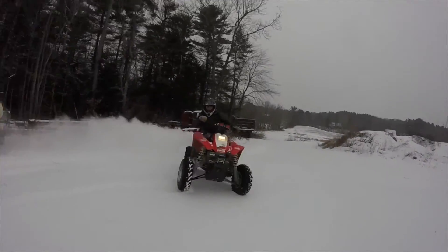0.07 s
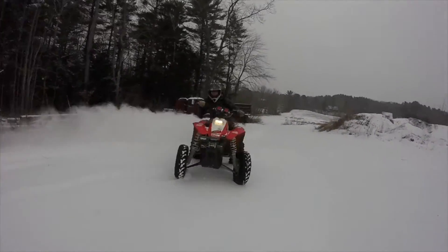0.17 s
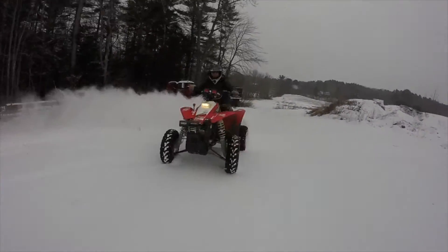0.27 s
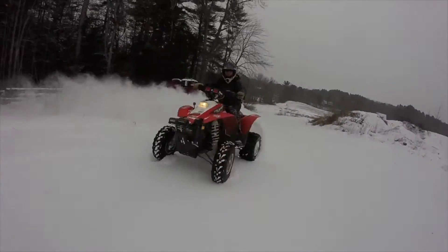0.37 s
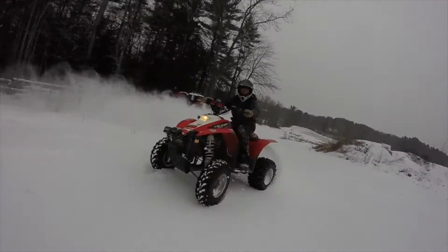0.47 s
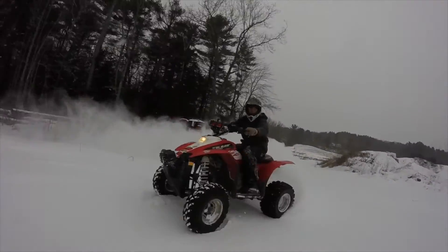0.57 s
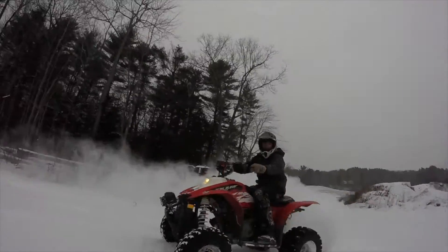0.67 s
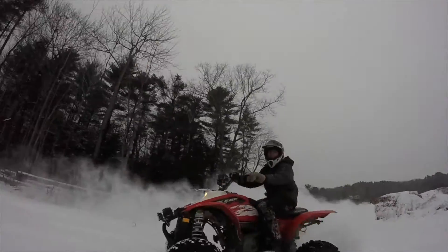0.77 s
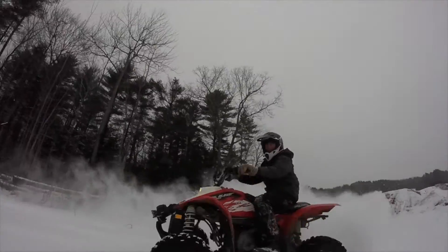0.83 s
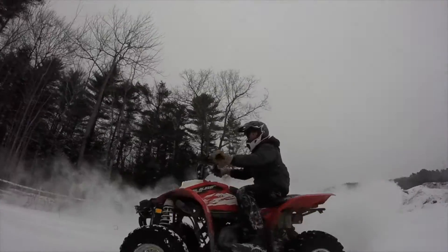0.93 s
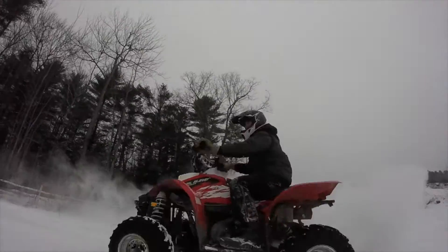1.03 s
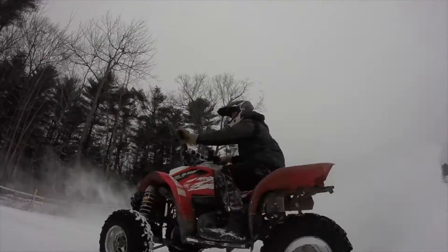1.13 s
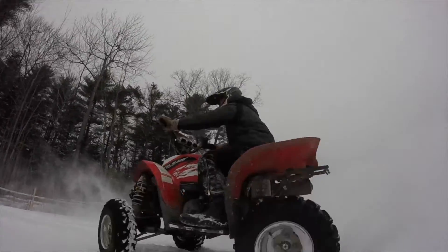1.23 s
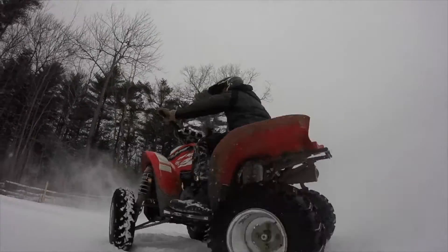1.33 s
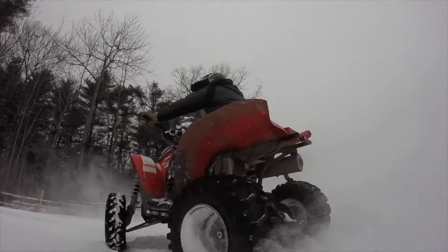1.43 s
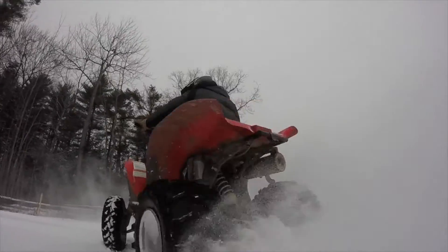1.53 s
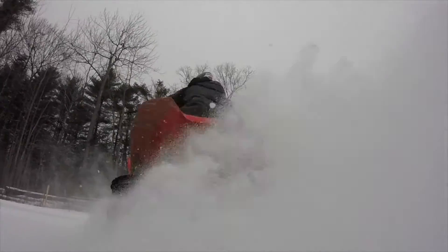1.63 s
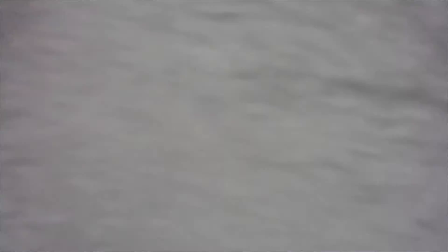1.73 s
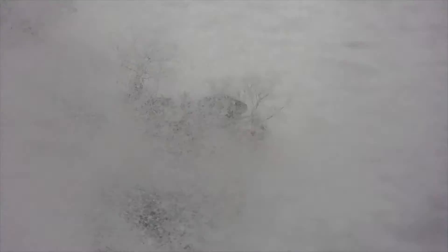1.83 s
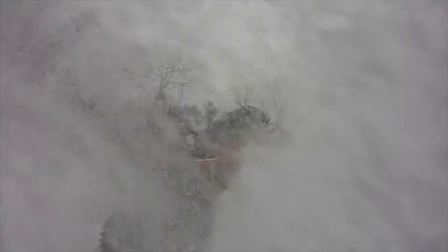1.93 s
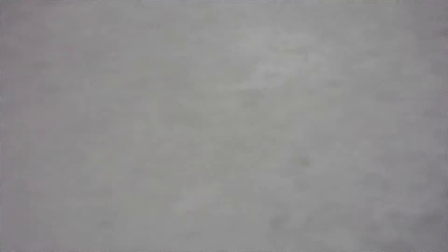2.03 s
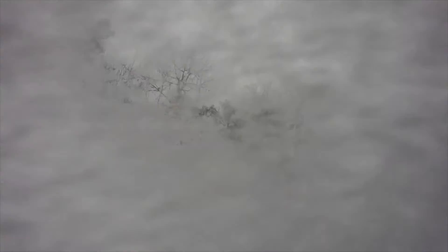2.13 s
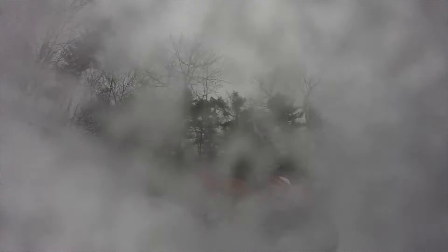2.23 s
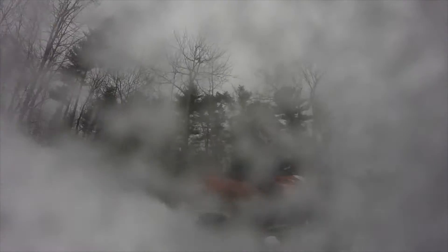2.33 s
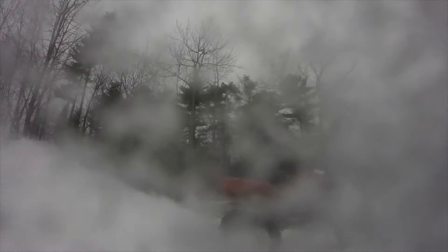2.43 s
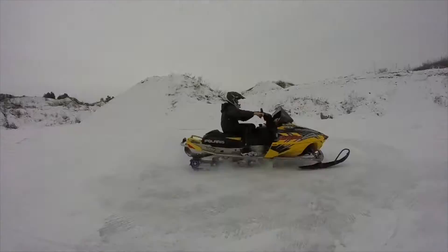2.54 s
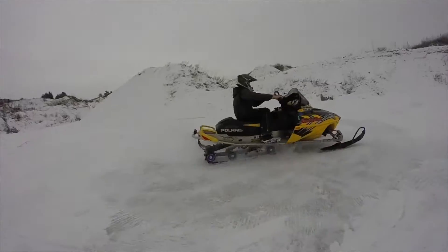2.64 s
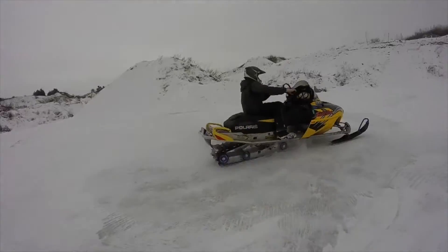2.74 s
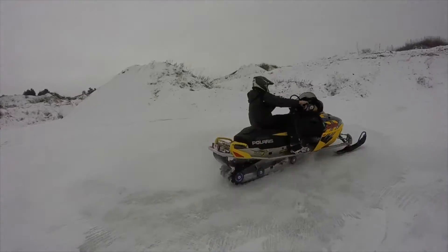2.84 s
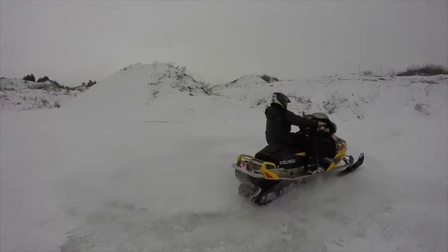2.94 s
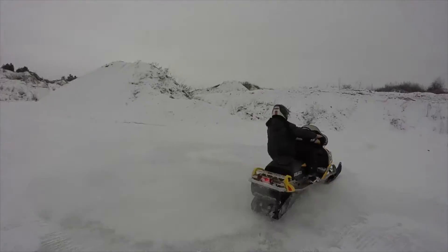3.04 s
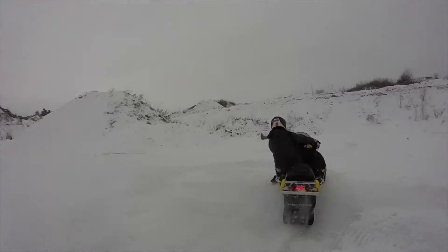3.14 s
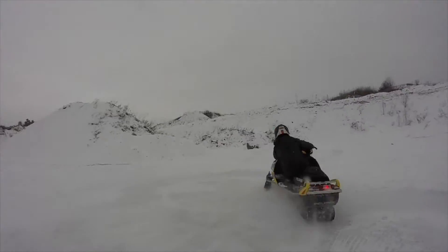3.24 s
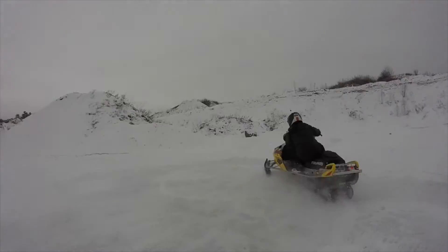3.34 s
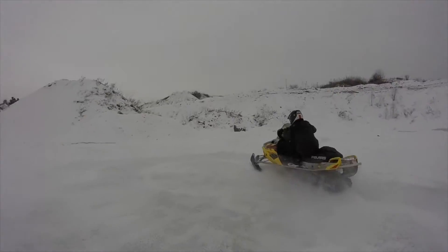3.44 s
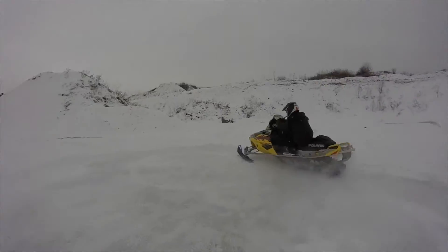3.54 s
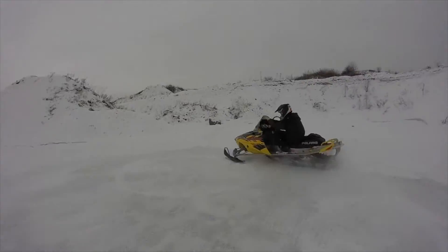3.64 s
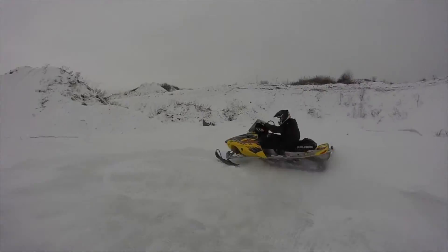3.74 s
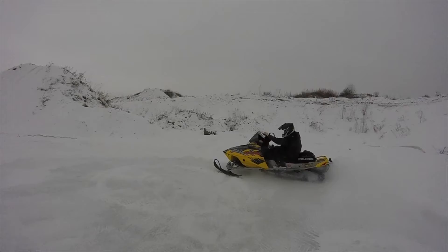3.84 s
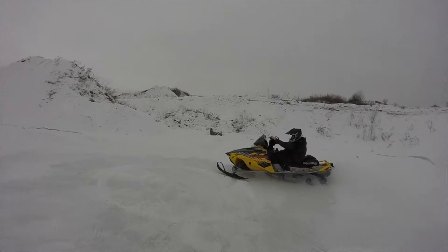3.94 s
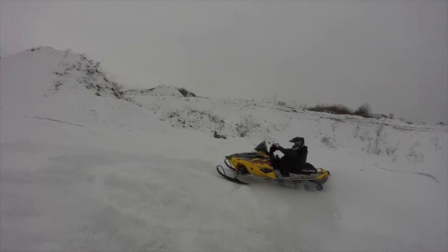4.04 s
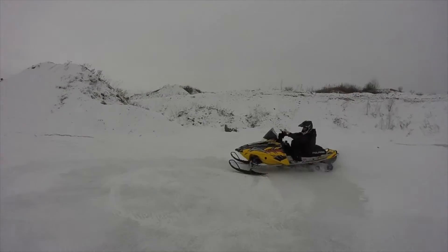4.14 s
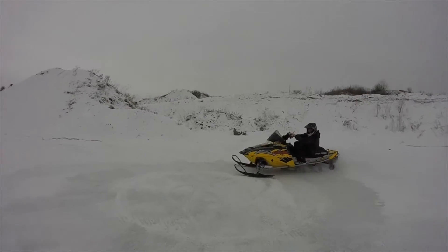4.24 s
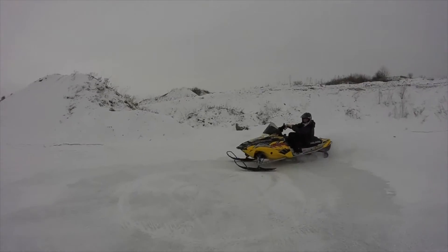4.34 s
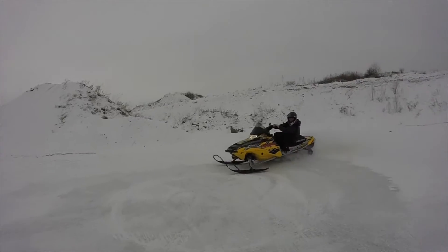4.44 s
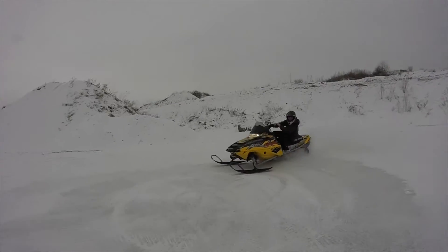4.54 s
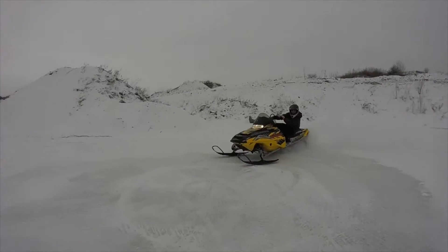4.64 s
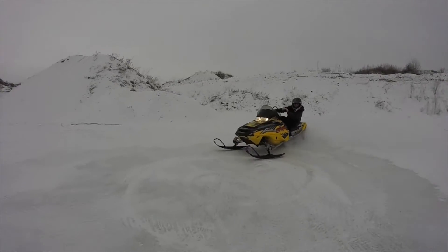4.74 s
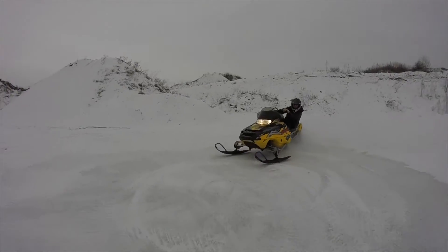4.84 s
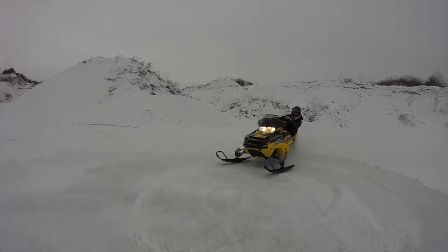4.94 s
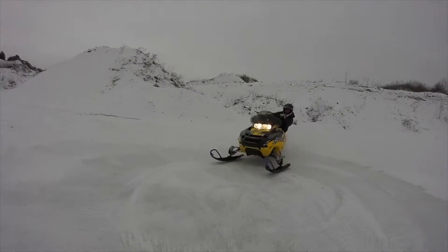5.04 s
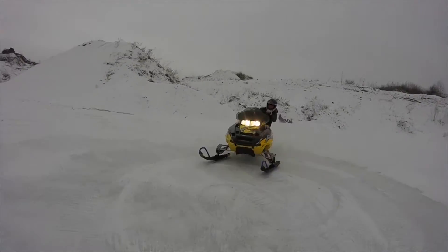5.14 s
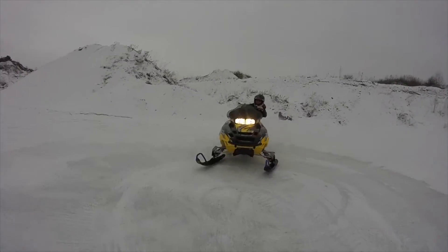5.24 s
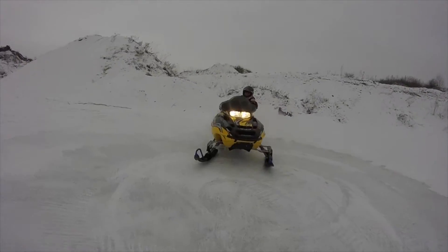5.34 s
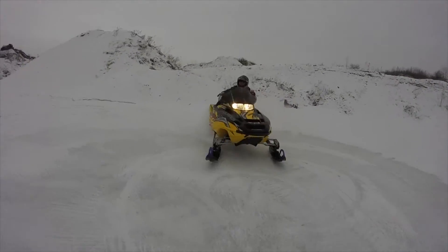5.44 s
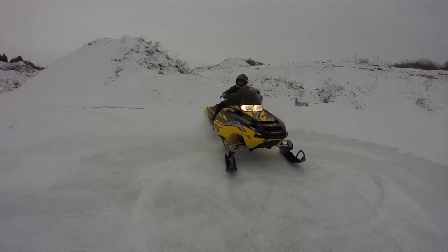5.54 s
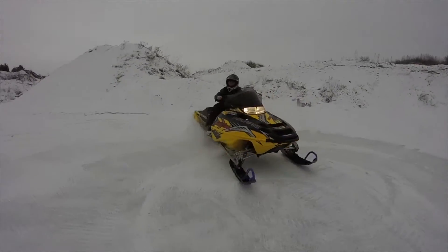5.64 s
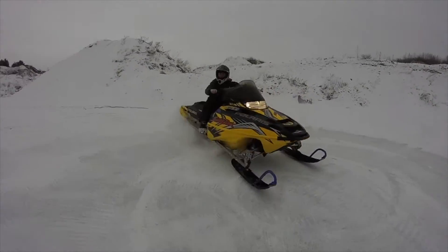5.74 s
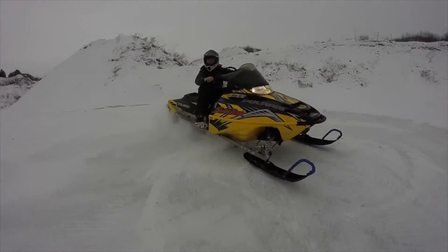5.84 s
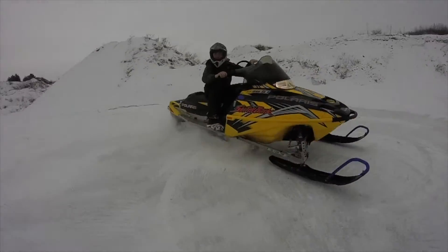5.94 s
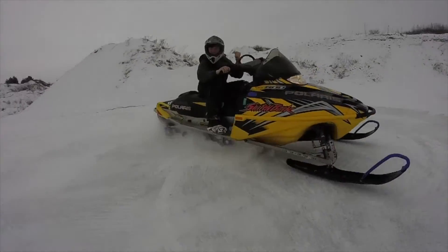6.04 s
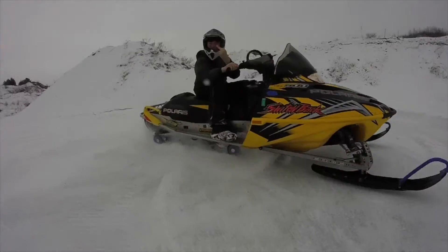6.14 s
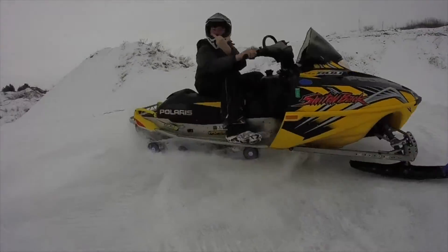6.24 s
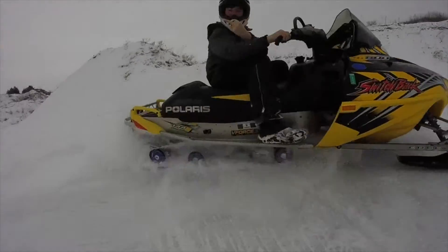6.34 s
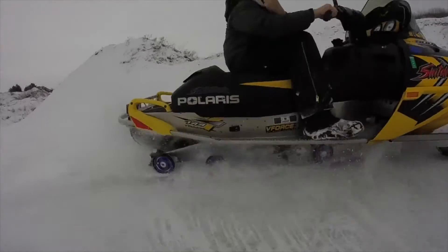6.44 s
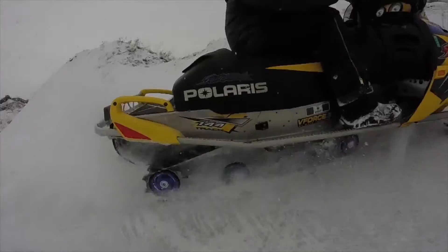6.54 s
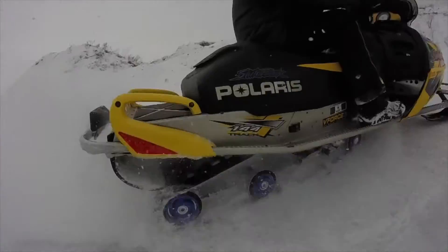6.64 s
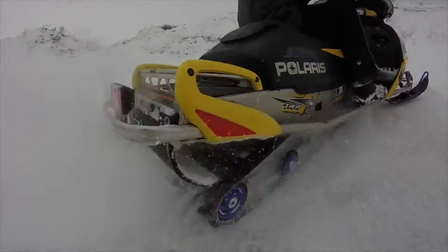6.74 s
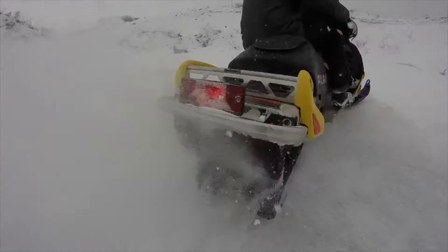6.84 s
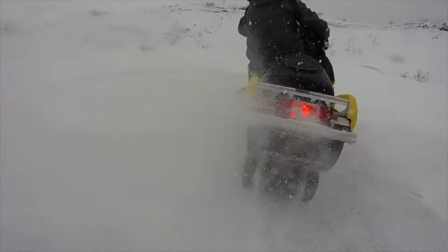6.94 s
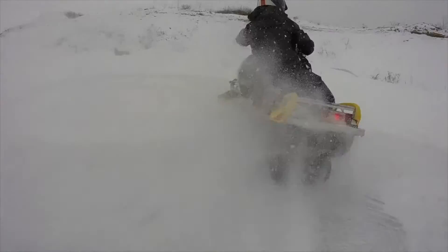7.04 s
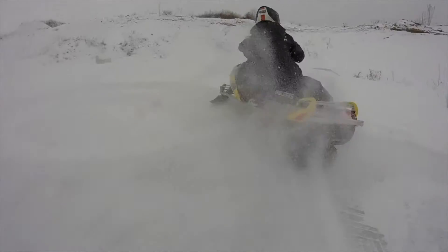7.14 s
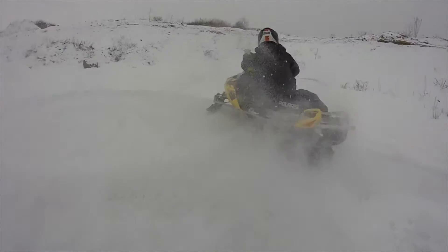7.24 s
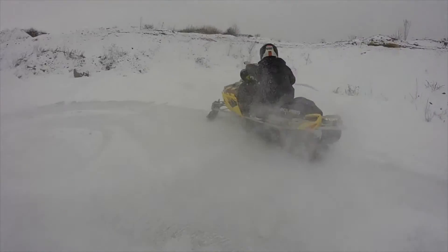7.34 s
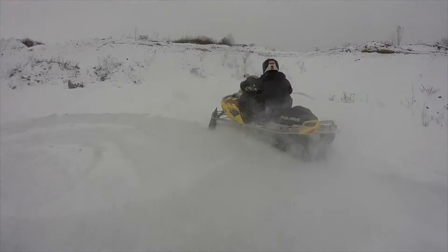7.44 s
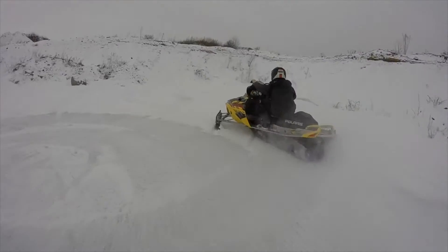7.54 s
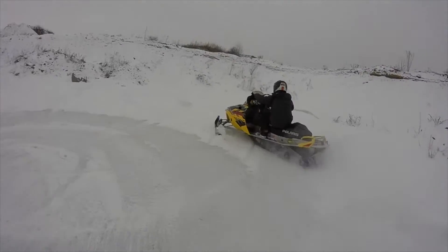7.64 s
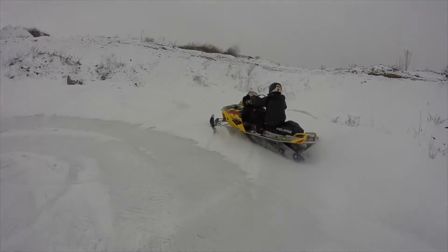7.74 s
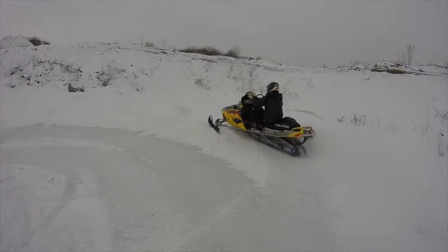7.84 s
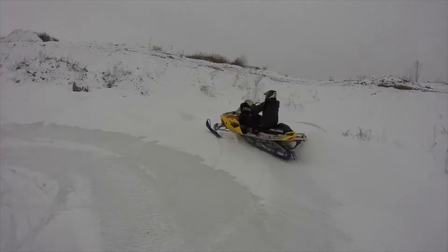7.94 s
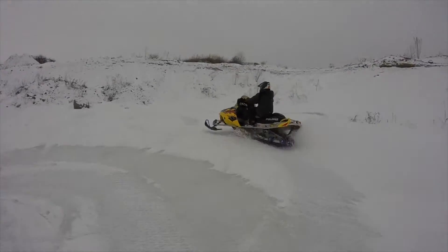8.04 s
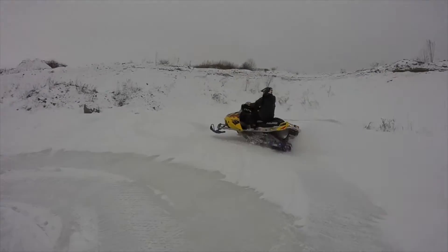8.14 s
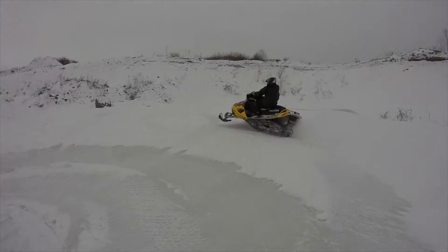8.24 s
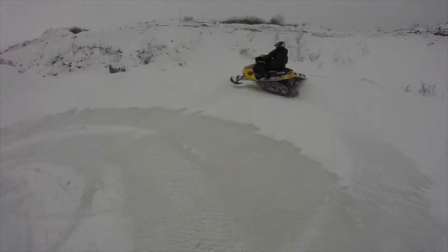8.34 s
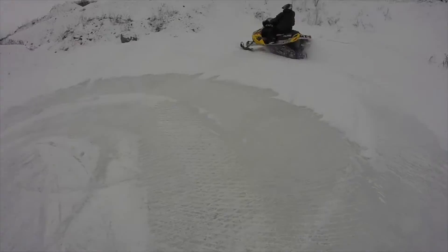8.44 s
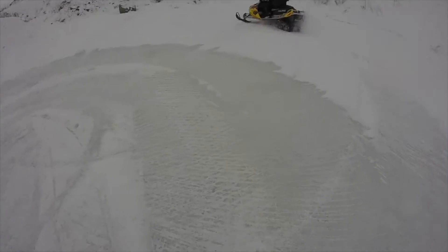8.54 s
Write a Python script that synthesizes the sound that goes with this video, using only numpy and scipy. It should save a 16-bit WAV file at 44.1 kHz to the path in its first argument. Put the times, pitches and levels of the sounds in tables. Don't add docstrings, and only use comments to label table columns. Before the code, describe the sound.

Open snowy ground, heard through a small plastic camera case that gives everything a hard, nasal midrange ring. From 0 s a single-cylinder quad putters low and rapid, with faint whistling gears and rattling panels; a lump knocks the case at 0.5 s. It grows nearer and rougher, strongest around 1.6-1.85 s. At 1.8-2.2 s snow slams the case: clustered knocks, a heavy thump, crackling hiss and bright ticks, while the engine drops and fades. At about 2.6 s a sudden cut brings a raspy two-stroke snowmobile, revs surging and sagging every fraction of a second. It is farther off around 4-5 s, barks at 5.7 s, then swells with a metallic whine from 6 to 6.9 s. Around 7-7.2 s it is loudest, coughing sharp pops amid ticking grains. It recedes after 7.3 s, dull and faint by 8.3 s, with a last small knock near 8.56 s. Wind rumbles softly throughout.

```python
import sys
import numpy as np
from scipy import signal
from scipy.fft import rfft, irfft
from scipy.io import wavfile
from scipy.ndimage import uniform_filter1d

SR = 44100
rng = np.random.default_rng(int(sys.argv[2]) if len(sys.argv) > 2 else 0)


def magnitude_from_level(level_db):
    exponent = np.asarray(level_db, float) / 20
    return 10 ** exponent


def put_to_file(sound):
    columns = np.atleast_2d(sound).T
    safe = np.clip(columns, -1, 1)
    whole_steps = np.round(safe * 32767)
    wavfile.write(sys.argv[1], SR, whole_steps.astype(np.int16))


N = 379260


def noise():
    return rng.standard_normal(N)


def unit(x):
    return x / np.sqrt(np.mean(x ** 2))


def curves(table):
    s, *columns = np.transpose(table)
    return [np.interp(np.arange(N) / SR, s, c) for c in columns]


def walk(rate):
    k = int(SR / rate)
    held = np.repeat(rng.standard_normal(N // k + 1), k)
    return unit(uniform_filter1d(uniform_filter1d(held, k), k)[:N])


def band(x, lo_hz, hi_hz, order=3):
    return signal.sosfilt(signal.butter(order, [lo_hz, hi_hz], "bandpass", fs=SR, output="sos"), x)


def swell(s, db, hold_s, rise, fall):
    t = np.arange(N) / SR - s
    return db + np.minimum(rise * np.minimum(t, 0), -fall * np.maximum(t - hold_s, 0))


def resonance(hz, rings):
    return sum(magnitude_from_level(2 * db) / (1 + (2 * (hz - f) / w) ** 2) ** 2 for f, w, db in rings)


def ring(x, rings, valley, size=4096):
    hz = np.maximum(np.arange(size + 1) * SR / 2 / size, 1)
    valley_hz, valley_db = np.transpose(valley)
    power = magnitude_from_level(2 * np.interp(np.log(hz), np.log(valley_hz), valley_db)) + resonance(hz, rings)
    cepstrum = irfft(np.log(power) / 2)
    cepstrum[1:size] *= 2
    cepstrum[size + 1:] = 0
    return signal.fftconvolve(x, irfft(np.exp(rfft(cepstrum)))[:size])[:N]


def rattle(clicks, decay_s, drift_hz):
    t = np.arange(int(5 * decay_s * SR)) / SR
    shapes = rng.standard_normal((3, len(t))) * np.exp(-t / decay_s) * (1 - np.exp(-4 * t / decay_s))
    shapes /= np.sqrt(np.sum(shapes ** 2, axis=1, keepdims=True))
    shares = np.array([walk(drift_hz) for _ in shapes])
    shares /= np.sqrt(np.sum(shares ** 2, axis=0))
    return sum(w * signal.fftconvolve(clicks, h)[:N] for w, h in zip(shares, shapes))


def throttle_of(hz):
    return np.clip(1.35 + uniform_filter1d(np.gradient(np.log(hz)) * SR, 600), 0, 1)


def engine(controls, multiples, notes, rings, valley, jitter, scatter_db, uneven_db, clatter_s, crisp,
           shut_db, puff, depth, low_db, low_share, wobble_db):
    hz, note_db, (mid_db, upper_db, hiss_db), facing, vent = controls
    turns = np.cumsum(hz * (1 + jitter * walk(40))) / SR
    turns += 1 - turns[int(1.5435 * SR)] % 1

    throttle = throttle_of(hz)
    note_db = note_db[:1] + [db - 9 * (1 - throttle) for db in note_db[1:]]
    voices = list(zip(multiples, note_db)) + [(k, note_db[0] + db) for k, db in notes]
    tones = np.zeros(N)
    for k, db in voices:
        tones += magnitude_from_level(db + wobble_db * walk(17)) * np.sin(2 * np.pi * (k * turns + rng.random()))

    at = np.flatnonzero(np.diff(np.floor(turns[:-1])) > 0) + 1
    late = turns[at] % 1 * SR / hz[at]
    weaker_cylinder = uneven_db * (np.arange(len(at)) % 2)
    size = magnitude_from_level(scatter_db * rng.standard_normal(len(at)) + weaker_cylinder)
    clicks = np.zeros(N)
    clicks[at - 1], clicks[at] = size * late, size * (1 - late)
    clicks = rattle(clicks * np.sqrt(SR / hz), clatter_s, 4.5)
    gas = unit(noise() * (1 + depth * np.exp(-(turns % 1) / puff)))

    clean = np.clip((note_db[0] - mid_db - shut_db) / 14, .3, crisp) * (.3 + .7 * throttle) * facing
    beat, breath = ring(clicks, rings, valley), ring(gas, rings, valley)
    mid, upper = (c * beat + np.sqrt(1 - c ** 2) * breath for c in (.86 * clean, clean))
    upper = upper - .7 * band(upper, 2260, 2360, order=1)

    out = np.sqrt(2) * tones
    sputter = 2.5 * (1 - facing) * walk(60)
    out += magnitude_from_level(mid_db + wobble_db * walk(25) + sputter) * unit(band(mid, 700, 1957))
    out += magnitude_from_level(upper_db + wobble_db * walk(25)) * unit(band(upper, 1810, 3650))
    vents = .3 * walk(1.5) * band(breath, 7100, 8300, order=1)
    hiss = band(breath, 5700, 18800) + 0.67 * band(breath, 3686, 4740) + vents
    out += magnitude_from_level(hiss_db + wobble_db * walk(9.1) / 2) * unit(hiss)
    out += vent * unit(band(breath, 7560, 8650, order=2))
    rumble_db = (mid_db + upper_db) / 2 + low_db + low_share * (mid_db + 26.5) - 5 * (1 - facing)
    return out + magnitude_from_level(rumble_db) * unit(band(breath, 69, 704))


# (time [s], level [dB])
SLED_LOUDNESS = [(2.59, -24.5), (2.75, -20.5), (2.99, -20), (3.24, -22.5), (3.37, -22.5), (3.79, -25),
                 (4.11, -28), (4.85, -28.5), (5.3, -26.5), (6.17, -22), (6.4, -19.5), (6.98, -18),
                 (7.11, -13.5), (7.26, -19.5), (7.83, -28.5), (8.02, -30.5), (8.25, -39.5), (8.55, -39)]
# (opening time [s], firing rate [Hz], shutting time [s], firing rate [Hz])
THROTTLE_BURSTS = [(2.42, 178, 2.61, 191.5), (2.775, 153, 3.015, 200), (3.25, 159, 3.42, 195.5),
                   (3.615, 167, 3.71, 179.5), (3.82, 162, 4.055, 200.5), (4.16, 187, 4.375, 242.5),
                   (4.555, 176, 4.755, 228.5), (4.955, 164, 5.105, 197.5), (5.205, 181, 5.435, 225),
                   (5.555, 194, 5.685, 202), (5.78, 183, 5.925, 206), (6.03, 200.5, 6.15, 215),
                   (6.275, 207, 6.4, 218.4), (6.475, 212.2, 6.6, 224.3), (6.69, 212.9, 6.81, 221.5),
                   (6.945, 184.5, 7.03, 187), (7.155, 161.5, 7.37, 186.5), (7.58, 172.5, 7.825, 201),
                   (8.065, 170, 8.19, 187.5), (8.21, 186, 8.7, 168)]
# (exhaust note level [dB], load added to the upper notes [dB])
BURST_LEVELS = [(-34, -5), (-30, 1.5), (-37.5, 4), (-42.5, 2), (-38.5, 7), (-30.5, -1), (-32, 0),
                (-39.5, 4.5), (-32, 0.5), (-33, -1), (-33, 2.5), (-27.5, -1.5), (-27.5, -0.5),
                (-23.5, -1.5), (-22.5, -5), (-37, 6), (-40, 7), (-39.5, -12), (-65, -3), (-58, -13)]
# (time [s], facing [0-1])
SLED_FACING = [(2.59, .9), (3.1, .85), (3.3, .7), (3.8, .8), (4.2, .92), (6.45, .92), (6.55, .85),
               (6.85, .85), (7.0, .55), (7.5, .6), (7.7, .8), (7.9, .75), (8.1, .3), (8.6, .3)]


def sled_controls():
    t = np.arange(N) / SR
    opens, low, shuts, top = np.transpose(THROTTLE_BURSTS)
    db, load = np.transpose(BURST_LEVELS)
    k = np.clip(np.searchsorted(opens, t) - 1, 0, len(opens) - 1)
    after = np.minimum(k + 1, len(opens) - 1)
    up = np.clip((t - opens[k]) / (shuts - opens)[k], 0, 1)
    up = up + .8 * up ** 2 * (1 - up)
    down = np.clip((t - shuts[k]) / np.abs(opens[after] - shuts[k]), 0, 1) ** .9
    hz = uniform_filter1d(low[k] + (top - low)[k] * up + (low[after] - top[k]) * down, size=900)

    shut, octaves = 1 - throttle_of(hz), np.log2(hz / 200)
    near, facing = curves(SLED_LOUDNESS)[0], curves(SLED_FACING)[0]
    note = db[k] + np.minimum(db[after] - db[k], 0) * down + 20.5 * np.log2(hz / top[k])
    note = uniform_filter1d(note, size=1300) - 5 * shut
    third = note + 5 * shut - 8 - 38 * (1 - facing) ** 2 + uniform_filter1d(load[k], size=1300)
    roar = near + 15.5 * octaves

    def layer(offset_db, db_per_octave, shut_loss_db, loudness_share):
        change = (loudness_share - 1) * (near + 25)
        return roar + offset_db + db_per_octave * octaves - shut_loss_db * shut + change

    upper = layer(-1.5, 5.5, 1.5, 0.83) - 4 * (.9 - facing)
    side_vent = magnitude_from_level(swell(3, -60, hold_s=1.5, rise=78, fall=60))
    return hz, [note, third], (roar, upper, layer(-19.5, 14.5, 1, 1.02)), facing, side_vent


# (multiple of firing rate, level under it [dB])
SLED_HARMONICS = [
    (.5, -23),
    (1, -11.5),
    (4, -26.5),
]
# (frequency [Hz], width [Hz], level [dB])
SLED_MODES = [(1158, 120, -1.5), (1606, 223, 1), (2158, 143, 0), (2469, 180, -2), (3380, 310, -15),
              (3950, 110, -27), (4200, 250, -12.5), (4810, 430, -26.5), (6100, 1000, -26),
              (7540, 670, -38.5), (8700, 880, -34.5), (11282, 210, -45)]
# (frequency [Hz], level [dB])
SLED_FLOOR = [(60, -29), (200, -27), (450, -17.5), (820, -22.5), (1350, -4), (2800, -12.5), (3900, -24),
              (5350, -41.5), (7000, -33.5), (10000, -45.5), (13900, -56), (16000, -63)]


def sled(driving):
    return engine(driving, [2, 3], SLED_HARMONICS, SLED_MODES, SLED_FLOOR, jitter=.002, scatter_db=1.5,
                  uneven_db=-2.5, clatter_s=.0016, crisp=.82, shut_db=-23, puff=0.93, depth=0.17,
                  low_db=-14.0, low_share=0.12, wobble_db=1.21)


# (time [s], peak level [dB])
LATE_FIRINGS = [
    (5.7109, -6),
    (5.7693, -8),
    (6.9127, -6),
    (6.9706, -13),
    (7.0636, -16),
    (7.1065, -14),
    (7.1493, -1),
    (7.1584, -15),
    (7.2094, -12),
]


def coughs():
    t = np.arange(N) / SR
    gap_s = .016
    dips = [np.clip(2 - 4 * np.abs(t - s + gap_s / 2 + .002) / gap_s, 0, 1) for s, db in LATE_FIRINGS]
    barks, ring_t = np.zeros(N), t[:2048]
    tone = np.minimum(ring_t / .0015, 1) * np.sin(2 * np.pi * 1560 * ring_t)
    for s, db in LATE_FIRINGS:
        at = int(s * SR)
        barks[at:at + 2048] += magnitude_from_level(db - 5.5 - 60 * ring_t / .025) * tone
    return magnitude_from_level(-6 * np.max(dips, axis=0)), barks


def track():
    near = curves(SLED_LOUDNESS)[0]
    thud_db = np.maximum(-49.5 + 0.79 * (near + 25) + 3 * walk(3.87), -55)
    thuds = magnitude_from_level(thud_db + 3.1 * walk(18)) * unit(band(noise(), 93.71, 220, order=2))
    return thuds + magnitude_from_level(near - 48) * unit(band(noise(), 9000, 15500, order=1))


def sing(hz, levels, multiples, rasp_db):
    turns = np.cumsum(hz * (1 + 0.002056 * walk(30))) / SR
    out = np.zeros(N)
    for k, db in zip(multiples, levels):
        out += np.sqrt(2) * magnitude_from_level(db + 1.27 * walk(25) + rasp_db * walk(110)) * np.sin(2 * np.pi * k * turns)
    return out


# (time [s], level [dB])
DRIVE_WHINE = [
    (5.76, -70),
    (5.82, -45),
    (6.05, -25),
    (6.09, -17.5),
    (6.47, -15),
    (6.53, -28),
    (6.82, -21),
    (6.9, -71),
]


def track_whine(sled_hz):
    level, modes = curves(DRIVE_WHINE)[0], [(2140, 420, -1.2), (2537, 360, -1.6)]
    multiples = [10, 11, 12, 13]
    levels = [level + 10 * np.log10(resonance(k * sled_hz, modes)) - 11.5 * (k % 2) for k in multiples]
    return sing(sled_hz, levels, multiples, 1.76)


def passage(s, hold_s, edge):
    at = slice(max(int((s - 30 / edge) * SR), 0), int((s + hold_s + 30 / edge) * SR))
    t = (np.arange(N) / SR)[at]
    return at, -edge * np.maximum(np.maximum(s - t, t - s - hold_s), 0)


def passing_tones(rows, clock):
    out, flutter = np.zeros(N), walk(45)
    for n, (s, hold_s, k, db) in enumerate(rows):
        at, shape = passage(s, hold_s, 450)
        level = db + shape + 2.6 * np.roll(flutter, n * 5003)[at]
        out[at] += np.sqrt(2) * magnitude_from_level(level) * np.sin(2 * np.pi * k * clock[at])
    return out


# (time [s], hold [s], multiple of
# firing rate, level [dB])
PIPE_SONGS = [(2.798, 0.054, 7, -32.5), (2.878, 0.14, 6, -30.5), (2.915, 0.15, 13, -34.5),
              (2.935, 0.06, 7, -28), (3.667, 0.059, 6, -34.5), (3.73, 0.07, 7, -40), (3.964, 0.12, 5, -45),
              (3.97, 0.093, 11, -38), (4.13, 0.082, 11, -36), (4.223, 0.2, 5, -38), (4.284, 0.07, 6, -29),
              (4.31, 0.06, 9, -40), (4.6, 0.05, 6, -38), (4.616, 0.15, 5, -44), (4.655, 0.061, 10, -33),
              (4.71, 0.046, 6, -30), (5.022, 0.13, 6, -31), (5.052, 0.044, 7, -26.5),
              (5.05, 0.072, 13, -38), (5.046, 0.1, 11, -35.5), (5.208, 0.082, 6, -30),
              (5.25, 0.1, 5, -38.5), (5.277, 0.035, 7, -25.5), (5.568, 0.07, 6, -31.5),
              (5.55, 0.26, 8, -34), (5.58, 0.12, 7, -31.5), (5.58, 0.12, 13, -36), (5.816, 0.16, 6, -29.5),
              (5.876, 0.19, 8, -27.5), (6.003, 0.043, 7, -25.5), (6.104, 0.27, 7, -24.5),
              (6.18, 0.19, 5, -32), (6.194, 0.08, 16, -39), (6.35, 0.064, 9, -29), (6.37, 0.088, 14, -37),
              (6.476, 0.052, 7, -24), (6.53, 0.12, 14, -31), (6.754, 0.074, 17, -39), (7.7, 0.23, 13, -47),
              (7.765, 0.11, 6, -38.5), (7.77, 0.084, 8, -29.5), (7.817, 0.04, 11, -40),
              (3.88, 0.2, 6, -32), (3.95, 0.13, 8, -30), (3.95, 0.11, 7, -33), (5.81, 0.07, 13, -29),
                    (5.89, 0.13, 11, -30), (5.93, 0.1, 13, -33), (4.56, .05, 6, -32), (6.6, 0.18, 11, -31),
                    (6.42, 0.18, 5, -29), (6.64, 0.07, 5, -19.5), (6.74, 0.091, 5, -29.5),
                    (6.3, .05, 19, -44), (6.53, 0.059, 11, -26), (6.66, 0.083, 11, -34),
                    (6.56, 0.054, 15, -35), (6.62, .04, 19, -47), (6.66, 0.065, 16, -41),
                    (6.72, .07, 20, -49), (6.56, .08, 17, -44), (7.72, .08, 10, -36)]


def songs(sled_hz):
    turns = np.cumsum(sled_hz * (1 + .004 * walk(70))) / SR
    return passing_tones(PIPE_SONGS, turns)


# (time [s], firing rate [Hz], level [dB])
QUAD_SLIDE = [(0.0, 55.53, -35), (0.23, 54.7, -37.5), (0.46, 55.3, -35), (0.63, 54.93, -33.5),
              (0.83, 55.5, -30.5), (1.03, 56.67, -28.5), (1.2, 56.87, -28), (1.5, 56.3, -27.5),
              (1.63, 55.7, -24.5), (1.685, 55.55, -25), (1.77, 55.12, -24.5), (1.84, 55, -23.5),
              (1.96, 54.1, -37), (2.07, 51.96, -35.5), (2.2, 49.9, -43.5), (2.36, 47.07, -45.5),
              (2.59, 36.7, -50)]
# (multiple of firing rate, level under it [dB])
QUAD_HARMONICS = [
    (1, -7.5),
    (3, -15),
    (5, -15),
    (7, -25),
    (8, -20.5),
]
# (frequency [Hz], width [Hz], level [dB])
QUAD_MODES = [(1482, 200, -2), (1650, 127, -4.5), (2030, 18, -18), (2425, 440, -17.5), (3300, 380, -15.5),
              (4130, 530, -18), (6320, 1000, -18.5), (9120, 400, -28.5), (11200, 454, -48)]
# (frequency [Hz], level [dB])
QUAD_FLOOR = [(60, -13.5), (200, -32), (500, -26), (1100, -24.5), (2200, -24.5), (5200, -48), (7500, -30.5),
              (12800, -45), (16000, -58.5)]


def quad():
    hz, db = curves(QUAD_SLIDE)
    t = np.minimum(np.arange(N) / SR, 2.586)
    second = db + np.minimum(-16 + 4.8 * t, -9.5)
    fourth = second + np.minimum(-31 + 14.5 * t, -7.5)
    sixth = np.minimum(db - 20.5, -49.5)
    roar = db, db + 2 - 3 * t, db - 12 - 0.92 * t
    controls = hz, [second, fourth, sixth], roar, 1, 0
    return engine(controls, [2, 4, 6], QUAD_HARMONICS, QUAD_MODES, QUAD_FLOOR, jitter=.0015, scatter_db=1.0,
                  uneven_db=0, clatter_s=.010, crisp=.72, shut_db=-25, puff=0.31, depth=0.6,
                  low_db=-14.0, low_share=0.033, wobble_db=1.13)


def pops():
    turns = np.cumsum(curves(QUAD_SLIDE)[0]) / SR
    turns -= turns[int(1.5435 * SR)]
    size_db = 2.5 * rng.standard_normal(N // 50)[np.floor(turns).astype(int)]
    phase = turns % 1 / .16
    puff = noise() * phase * np.exp(-phase) * magnitude_from_level(size_db)
    bright = unit(band(puff, 5800, 12500, order=1))
    case = unit(band(puff, 1540, 1620, order=1))
    return magnitude_from_level(swell(1.52, -54, hold_s=.2, rise=110, fall=60)) * (bright + magnitude_from_level(21) * case)


# (time [s], frequency [Hz],
# level [dB])
QUAD_WHISTLE = [(0.05, 1664, -36.5), (0.179, 1650, -34.5), (0.304, 1635, -23), (0.416, 1650, -42),
                (0.498, 1626, -33), (0.63, 1642, -49), (1.015, 1650, -34.5), (1.045, 1641, -24),
                (1.22, 1650, -23.5), (1.32, 1643, -29), (1.5, 1624, -45)]
WHISTLE_PARTIALS = [1, 1.265, 29 / 30, 31 / 30]


def quad_whistle():
    last_s, last_hz, _ = QUAD_WHISTLE[-1]
    hz, db = curves([*QUAD_WHISTLE, (last_s + 0.0402, last_hz, -80)])
    gear = swell(0, -45.5, hold_s=1.13, rise=50, fall=43)
    return sing(hz, [db, gear, db - 19.5, db - 11.5], WHISTLE_PARTIALS, 0)


# (time [s], hold [s], frequency [Hz], level [dB])
QUAD_TONES = [(0, .25, 2035, -48), (.4, .4, 2025, -45), (1.1, .27, 2035, -44), (.1, .2, 2546, -48),
              (.05, .2, 2596, -49), (.75, .12, 2586, -43), (.75, .2, 2630, -45), (.86, .1, 2396, -41),
              (.86, .1, 2444, -41), (1.0, .27, 2376, -40), (1.0, .15, 2427, -40), (1.0, .12, 2596, -41),
              (1.14, .1, 2553, -44), (.1, .35, 3400, -45), (.55, .4, 3390, -44), (1.0, .25, 3298, -42),
              (.8, .6, 1812, -45), (.85, .1, 1670, -32), (1.15, .1, 1476, -36), (1.6, .1, 1559, -33)]


def quad_tones():
    return passing_tones(QUAD_TONES, np.arange(N) / SR + .003 * np.cumsum(walk(30)) / SR)


# (time [s], hold [s], frequency [Hz], level [dB])
PASSING_VENTS = [(.1, 0.7, 8300, -67), (0.41, .22, 10500, -64), (0.75, 0.19, 6540, -41.5),
                 (0.72, .2, 6100, -46), (.7, 0.38, 7300, -61), (1.1, 0.356, 11000, -64),
                 (0.98, 0.43, 9200, -60), (1.51, .25, 8500, -48.5), (1.9, .4, 8300, -57),
                 (1.5, .25, 6900, -45)]
# (time [s], hold [s], frequency [Hz], level [dB])
HOOD_RINGS = [(5.296, 0.23, 1687, -28), (4.597, 0.084, 1655, -30.5), (6.946, 0.22, 1108, -31),
              (7.287, 0.12, 1680, -40), (7.573, 0.078, 1700, -33), (7.74, 0.086, 1700, -32),
              (7.9, 0.058, 1630, -28.5), (8.13, 0.028, 1310, -42)]


def vents_and_hood():
    out, air = np.zeros(N), noise()
    for s, hold_s, hz, db in PASSING_VENTS + HOOD_RINGS:
        at, shape = passage(s, hold_s, 120)
        out[at] += magnitude_from_level(db + shape) * unit(band(air[at], .965 * hz, 1.035 * hz, order=2))
    return out


# (time [s],
# knock peak [dB], hiss minus knock [dB], t60 [s], crumble [s])
CASE_KNOCKS = [(0.505, -2, -35, 0.017, 0.0056), (0.514, -17.5, -30, 0.035, 0.0029),
               (0.523, -14.5, -5, 0.022, 0.0082), (0.535, -15, -10, 0.059, 0.0023),
               (1.797, -19, -13, 0.032, 0.0021), (1.8174, -26, -2, 0.025, 0.0018),
               (1.834, -12, -5, .03, 0.0018), (1.854, -10, 2, 0.031, 0.013), (1.88, -2, 1, 0.041, 0.0063),
               (1.902, 0, -5.5, 0.033, 0.0035), (1.9078, -5.5, 0, 0.048, 0.0086),
               (1.935, -14, -9, 0.041, 0.016), (1.962, -24, -1.5, .02, 0.03),
               (2.0194, -31.5, -20, 0.034, 0.0018), (2.038, -32, -22, .04, .002),
               (2.0565, -36, -17, 0.035, .003), (2.079, -29, -15, 0.039, .002),
               (2.114, -23.5, 1, 0.097, 0.0045), (2.1423, -1, -8, 0.0081, 0.0033),
               (2.1484, -13, 0.5, 0.064, 0.008), (2.1627, -7, -9, 0.012, 0.0043),
               (2.167, -16, -2, 0.071, 0.0065), (8.559, -29.5, -13, 0.086, 0.015)]
# (frequency [Hz], width [Hz], level [dB])
KNOCK_MODES = [
    (1590, 220, 13.4),
    (2365, 680, 10.2),
    (3580, 1020, 3.3),
]


def case_knocks():
    t = np.arange(4096) / SR
    knock, hiss, strike = np.zeros((3, N + 4096))
    for s, db, hiss_db, t60, crumble in CASE_KNOCKS:
        at = slice(int(s * SR), int(s * SR) + 4096)
        shape = magnitude_from_level(db - 60 * np.clip(t - crumble, 0, 1) / t60)
        knock[at] = np.maximum(knock[at], shape)
        hiss[at] = np.maximum(hiss[at], shape * magnitude_from_level(hiss_db))
        strike[at.start + 8] = magnitude_from_level(db)
    grit = noise() * magnitude_from_level(2.5 * walk(900))
    valley = [(60, -42), (700, -32), (5000, -21), (16000, -55.5)]  # (frequency [Hz], level [dB])
    rings = ring(strike[:N], KNOCK_MODES, valley)
    out = magnitude_from_level(-7.5) * knock[:N] * unit(ring(grit, KNOCK_MODES, valley))
    out += magnitude_from_level(-9) * rings / np.abs(rings).max()
    return out + magnitude_from_level(-13.5) * hiss[:N] * unit(band(grit, 5300, 7900, order=1))


# (time [s], level [dB])
MOUNT_THUMPS = [
    (0.504, -22),
    (.725, -37.5),
    (1.075, -35.5),
    (1.9, -17),
]


def thumps():
    t = np.arange(N) / SR
    shape = sum((t >= s) * magnitude_from_level(db - 60 * np.clip(t - s, 0, 1) / 0.083) for s, db in MOUNT_THUMPS)
    return shape * unit(band(noise(), 45, 290, order=1))


# (time [s], peak level [dB], centre frequency [Hz])
SNOW_GRAINS = [(.37, -39.5, 8900), (.645, -38, 4984), (1.335, -40, 12800), (1.787, -24, 6300),
               (1.826, -23, 6350), (1.9397, -17, 6230), (1.9488, -29, 6420), (1.9858, -23, 7105),
               (2.192, -18.5, 6784), (2.2084, -35.5, 7180), (2.221, -28.5, 6070), (2.2903, -40, 7800),
               (2.2998, -28, 6270), (2.3214, -41, 6020), (2.446, -53, 2986), (2.547, -42, 3020),
               (6.9715, -36, 10000), (6.9813, -12.5, 5760), (7.004, -37, 9000), (7.12, -34, 9000),
               (7.194, -35, 11000), (7.257, -37, 9000), (6.986, -22, 8700), (7.0496, -15, 8613),
               (7.0593, -17, 8000), (7.0654, -23, 6740), (7.075, -23, 6132), (7.0955, -11, 5500),
               (7.1017, -20, 8950), (7.11, -35, 7560), (7.159, -33, 6480), (7.172, -15.5, 6540),
               (7.2104, -35, 7880), (7.2264, -34, 7480), (7.25, -27, 8900), (7.379, -25.5, 6100),
               (7.4413, -26, 7450), (7.4666, -22.5, 6000), (7.4935, -33, 7540),
               (0.724, -25, 3680),
    (1.079, -28.5, 4097),
    (3.754, -22, 4000),
    (7.1392, -19, 3640),
    (8.3994, -40, 3480),
]


def ticks():
    out, t = np.zeros(N), np.arange(256) / SR
    shape = np.exp(-t / 0.001) * np.minimum(t / 0.000094, 1)
    for s, db, hz in SNOW_GRAINS:
        tick = band(rng.standard_normal(256) * shape, .48 * hz, min(1.6 * hz, 13500), order=2)
        out[int(s * SR):int(s * SR) + 256] += magnitude_from_level(db) * tick / np.abs(tick).max()
    return out


# (time [s], level [dB], hold [s], rise [dB/s], fall [dB/s])
SNOW_SHOWERS = [
    (1.841, -29.5, 0.066, 403.5, 280),
    (2.16, -36, 0.013, 170, 300),
    (7.0, -72, .45, 260, 150),
]


def spray():
    size_db = 2.8 * np.minimum(rng.exponential(size=N), 3.5)
    grains = (rng.random(N) < 2500 / SR) * magnitude_from_level(size_db) * noise()
    level = sum(magnitude_from_level(swell(*row)) for row in SNOW_SHOWERS)
    return level * unit(band(grains + .5 * noise(), 1700, 9000, order=1))


# (time [s], level [dB], fall [dB/s])
WIND_GUSTS = [
    (0, -35, 26),
    (0.382, -34, 8),
    (1.92, -37, 145),
    (2.66, -40.5, 14),
    (3.64, -46, -3),
    (4.41, -45, 15),
    (4.86, -42, 21),
    (5.7, -39, 19),
    (7.33, -54, .4),
    (8.6, -40, 6),
]


def wind():
    db = np.max([swell(s, db, 0, 99, fall) for s, db, fall in WIND_GUSTS], axis=0)
    rumble = band(noise(), 5.2, 26, order=2) + 0.083 * band(noise(), 50, 100, order=1)
    return magnitude_from_level(np.maximum(db, -57) + 0.63 * walk(6.2)) * unit(rumble)


def scene():
    after = np.clip((np.arange(N) / SR - 2.586) / 0.0084, 0, 1)
    driving = sled_controls()
    sled_hz = driving[0]
    gap, barks = coughs()
    machines = after * (gap * sled(driving) + barks + track()) + (1 - after) * quad()
    machines += track_whine(sled_hz) + songs(sled_hz)
    machines += pops() + quad_whistle() + quad_tones() + vents_and_hood()
    steady = signal.sosfilt(signal.ellip(10, .3, 60, 15250, fs=SR, output="sos"), machines)
    snow = case_knocks() + thumps() + ticks() + spray()
    return (steady + snow + wind())[None]


def low_pass(x):
    return signal.sosfilt(signal.butter(12, 16100, fs=SR, output="sos"), x)


def record(dry):
    rounded = np.tanh(1.1 * dry) / 1.05
    x = signal.sosfilt(signal.butter(10, 15500, fs=SR, output="sos"), rounded)
    return low_pass(x)


dry = scene()
out = record(dry)
put_to_file(out)
```